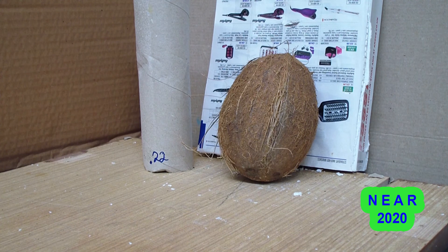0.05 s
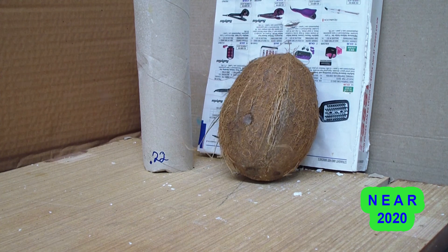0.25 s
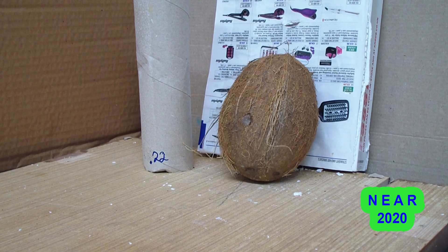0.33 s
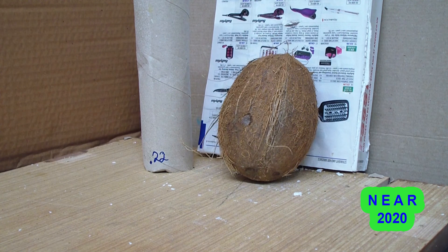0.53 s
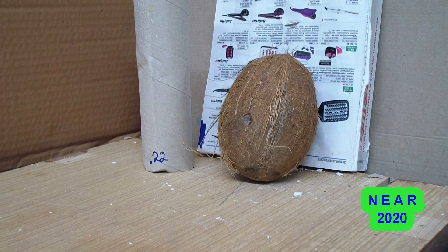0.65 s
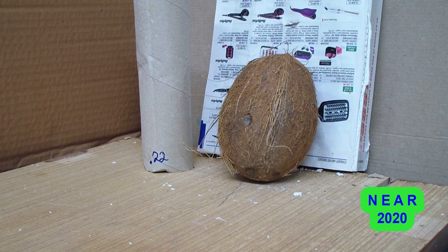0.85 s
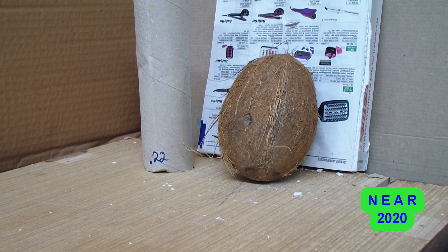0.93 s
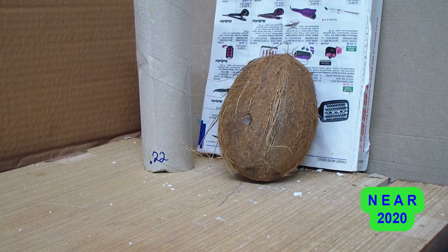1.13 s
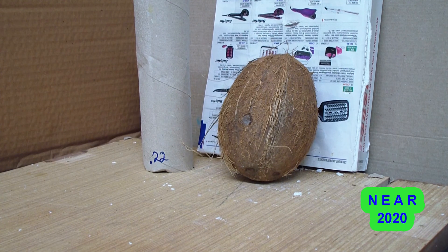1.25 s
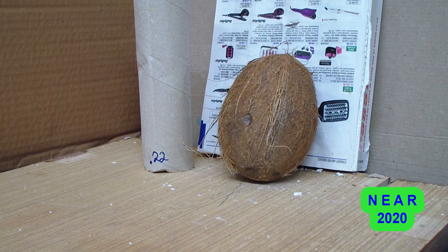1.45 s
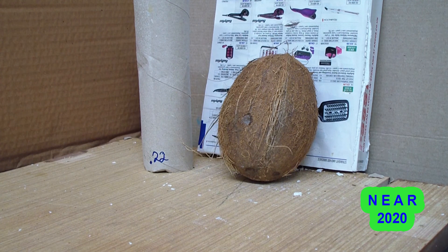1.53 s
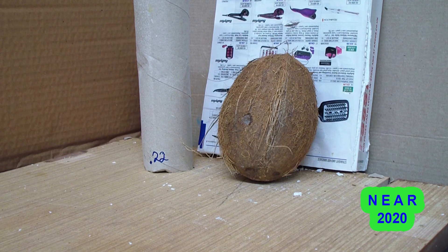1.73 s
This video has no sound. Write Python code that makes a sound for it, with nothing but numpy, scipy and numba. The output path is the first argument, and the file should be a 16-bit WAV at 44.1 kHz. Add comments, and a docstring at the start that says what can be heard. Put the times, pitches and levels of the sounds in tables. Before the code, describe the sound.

One loud air gun shot smacks a coconut close by, followed by quiet mechanical clicks and knocks

```python
"""Air rifle and coconut

A coconut stands close to the microphone among walls that echo briefly, and an air rifle fires at it.
The pellet's crack and shell ring come just before the report, a puff and rush of air with a boom.
Filtered noise bursts make small ticks, some of them chips, and the rifle's action clacking and knocking.
The recorder overloads and its gain ducks, then recovers while the echo dies; behind lie rustle and rumble.
"""
import sys
import numpy as np
from scipy import signal
from scipy.fft import rfft, irfft, next_fast_len
from scipy.io import wavfile
from numba import njit

SR = 44100
rng = np.random.default_rng(int(sys.argv[2]) if len(sys.argv) > 2 else 0)


def dump(signal):
    """Clip the signal to [-1, 1] and save it as 16-bit WAV at the path in sys.argv[1]."""
    limited = np.clip(np.atleast_2d(signal).T, -1, 1)
    pcm = np.round(limited * 32767).astype(np.int16)
    wavfile.write(sys.argv[1], SR, pcm)


N = 79380

# Spectrum levels are per Hz and relative: colour() evens out overall level, ambience() sets its own RMS.

# The coconut on its board, close by: one low bounce and the shell's ring: pitch_hz, level_db, t60_s
SHELL_MODES = [(117.5, -16, .04), (1390, -10, .005), (2013, -4.5, .008), (4480, -12, .01),
               (6800, -16, .012)]
# Spectrum of the crack: pitch_hz, level_db
CRACK_SPECTRUM = [(100, 7.5), (600, -4.5), (2000, -9), (5000, -7), (8000, -8), (16000, -30)]
STRIKE_S, STRIKE_DB, STRIKE_RISE_S = .2326, -38, .0016
# These three are relative to the strike, the echo to its crack
CRACK_DB, THUMP_DB, CRACK_ECHO_DB = -1, -12, -2


def pellet():
    """The pellet cracks the shell, rings it and shoves the nut against its backing."""
    onset = np.minimum(clock() / STRIKE_RISE_S, 1) ** 2
    shell = unit(ring(SHELL_MODES) * onset)
    thump = undb(THUMP_DB) * push(peak_s=0.00071)
    contact = hit(STRIKE_S + STRIKE_RISE_S, CRACK_DB, fall_s=.012, echo_db=CRACK_ECHO_DB)
    crack = colour(contact, CRACK_SPECTRUM)
    return undb(STRIKE_DB) * (at(shell + thump, STRIKE_S) + crack)


# Spectrum of the escaping air: pitch_hz, level_db
AIR_SPECTRUM = [(25, 7.5), (55, -9.5), (105, 2.5), (160, -12.5), (230, 1.5), (300, -9), (700, 3),
                (1100, -1), (1500, 2), (2800, 0), (5000, 1.5), (8000, -2), (12000, -7.5), (16000, -8)]
# Narrow resonances the shot wakes in the space and the things in it: pitch_hz, level_db, t60_s
ROOM_MODES = [(135.9, -8.5, 0.58), (184, -26, 0.91), (212, -26, 0.95), (232, -18.5, 0.49), (525, -22, 0.29),
              (727, -8, 0.14), (942, -20, 0.36), (1420, -11, 0.41), (1615, -14, 0.45), (1850, -12, 0.23)]
REPORT_S, REPORT_DB, BOOM_DB = .2408, -18.5, -4.5
AIR_RISE_S, AIR_FALL_S = 0.0087, 0.015
# Relative to the direct air
AIR_ECHO_DB, PUFF_DB = 9.5, -17


def report():
    """A puff and a rush of air from the muzzle; the space booms and the pressure swings slowly back."""
    t = clock()
    rise = np.minimum(t / AIR_RISE_S, 1)
    fall = np.exp(-np.maximum(t - AIR_RISE_S, 0) / AIR_FALL_S)
    rush = unit(rng.standard_normal(N) * rise * fall)
    echo = undb(AIR_ECHO_DB) * at(walls(), AIR_RISE_S / 2)
    air = colour(rush + echo, AIR_SPECTRUM)
    puff = undb(PUFF_DB) * push(peak_s=0.00035)
    blast = undb(REPORT_DB) * (air - puff)
    boom = undb(BOOM_DB) * ring(ROOM_MODES)
    swing = ring([(4.6, -5.5, 0.43)])  # pitch_hz, level_db, t60_s
    return at(blast + boom - swing, REPORT_S)


# Small ticks after the shot, chips landing and lastly a duller tick of the action:
# start_s, level_db (before filtering), low_edge_hz, high_edge_hz
TICKS = [(0.4716, -47.5, 900, 13000), (0.7703, -66.5, 4900, 19200), (1.0735, -60, 790, 3500)]
# Spectrum of a tick: pitch_hz, level_db
TICK_SPECTRUM = [(200, -41), (1000, 11.5), (2000, 1.5), (4000, 6.5), (6500, 9.5), (10000, -1), (16000, 4.5)]


def ticks():
    """Small ticks after the shot: chips landing, and lastly a duller tick of the action."""
    bursts = sum(band(hit(start, db, fall_s=0.0019, echo_db=-5), low_hz, high_hz)
                 for start, db, low_hz, high_hz in TICKS)
    return colour(bursts, TICK_SPECTRUM)


# Clacks and a faint scrape of the action: start_s, level_db, fall_s (to 1/e)
CLACKS_AND_SCRAPE = [(0.8091, -65, 0.0024), (.8147, -53.5, .0015), (.8211, -56.5, 0.0016),
                     (0.827, -56, 0.0021), (.934, -70.5, 0.0087), (1.588, -69.5, 0.027),
                     (1.657, -73.5, 0.018)]
# Spectrum of the clacks and scrape: pitch_hz, level_db
CLACK_SPECTRUM = [(100, -22.5), (450, -10.5), (610, 0), (850, -5.5), (1700, -5), (2400, 0), (3100, 0.5),
                  (4300, -2.5), (5800, -3.5), (8000, -11.5), (11000, -18), (16000, -24)]
# Ring of the cocking parts: pitch_hz, level_db, t60_s
LEVER_MODES = [(619, -3, 0.26), (2410, 4, 0.1), (3060, 5, 0.11)]
LEVER_DB = -11  # relative to the noise it goes with


def clacks_and_scrape():
    """Clacks and a faint scrape of the action: noise bursts, each with a ring of the cocking parts."""
    lever = undb(LEVER_DB) * unit(ring(LEVER_MODES))
    bursts = sum(hit(start, db, fall_s, echo_db=1.5) for start, db, fall_s in CLACKS_AND_SCRAPE)
    rings = sum(at(undb(db) * lever, start) for start, db, _ in CLACKS_AND_SCRAPE)
    return colour(bursts, CLACK_SPECTRUM) + rings


# Dull knocks as the action meets its stop:
# start_s, level_db (before filtering), low_edge_hz, high_edge_hz, echo_db (relative to the contact)
KNOCKS = [(.9645, -46, 230, 11990, -0.5), (1.5012, -60, 930, 4170, 5.5)]
# Spectrum of a knock: pitch_hz, level_db
KNOCK_SPECTRUM = [(100, -0.5), (250, 0.5), (400, 0.5), (560, 3.5), (720, -1.5), (1300, 0), (2200, -2.5),
                  (3200, -8.5), (5000, -12), (8000, -22), (16000, -28.5)]
# The stock's short woody ring under a knock: pitch_hz, level_db, t60_s
STOCK_MODES = [(467, 4, 0.043), (722, -21.5, 0.038), (1320, -19, 0.0073), (1700, -4, 0.014),
               (2140, -6.5, 0.012)]
STOCK_DB = -6  # relative to its knock


def knocks():
    """The action meets its stop: a very short contact over the stock's woody ring."""
    stock = undb(STOCK_DB) * unit(ring(STOCK_MODES))
    total = np.zeros(N)
    for start, db, low_hz, high_hz, echo_db in KNOCKS:
        contact = colour(hit(start, db, fall_s=0.0011, echo_db=echo_db), KNOCK_SPECTRUM)
        woody = at(undb(db) * stock, start)
        total += band(contact + woody, low_hz, high_hz)
    return total


# The catch snapping shut: start_s, level_db
SNAPS = [(1.7449, -53.5), (1.7485, -53)]
# Spectrum of the catch: pitch_hz, level_db
CATCH_SPECTRUM = [(150, -22.5), (750, -13), (1050, -18.5), (1350, -4), (2300, -2.5), (3000, -9.5),
                  (3600, 1.5), (4100, 0.5), (4900, -14), (7000, -14.5), (10000, -38), (16000, -29)]


def catch():
    """The catch snaps shut in short noisy contacts."""
    snaps = sum(hit(start, db, fall_s=0.0033, echo_db=0) for start, db in SNAPS)
    return colour(snaps, CATCH_SPECTRUM)


SLIDE_S, SLIDE_RISE_S, SLIDE_FALL_S = 1.665, .02, .25
SLIDE_DB, SLIDE_LOW_HZ = -53, 3500


def slide():
    """A faint slide of the action: treble noise that comes up quickly and dies away."""
    hiss = highpass(burst(SLIDE_FALL_S), SLIDE_LOW_HZ)
    rise = np.minimum(clock() / SLIDE_RISE_S, 1)
    return at(undb(SLIDE_DB) * hiss * rise, SLIDE_S)


RUSTLE_S, RUSTLE_RISE_S, RUSTLE_DB = 0.35, 0.27, -57


def rustle():
    """A faint hiss of movement once the shot is over: band-limited noise that fades in and stays."""
    swell = np.clip((clock() - RUSTLE_S) / RUSTLE_RISE_S, 0, 1)
    hiss = band(rng.standard_normal(N), low_hz=490, high_hz=8750)
    return undb(RUSTLE_DB) * swell * hiss


# Spectrum of the quiet place: pitch_hz, level_db
AMBIENCE_SPECTRUM = [(12, -4.5), (20, -2.5), (210, -17.5), (241, -13.5), (337, -19.5), (367, -21),
                     (802, -22.5), (1030, -25.5), (1530, -17.5), (1760, -26.5), (1960, -17), (3160, -27.5),
                     (4540, -28.5), (6910, -36), (16000, -38)]
AMBIENCE_DB = -53.5  # RMS


def ambience():
    """Faint steady rumble and hiss: noise shaped in frequency."""
    gain = undb(lookup(AMBIENCE_SPECTRUM, np.fft.rfftfreq(N, 1 / SR)))
    x = irfft(rfft(rng.standard_normal(N)) * gain, N)
    return undb(AMBIENCE_DB) * x / np.std(x)


# Echo of the walls: pitch_hz, t60_s (before the early emphasis)
WALL_T60 = [(60, 0.29), (220, 0.48), (500, 0.35), (1500, .38), (4000, 0.39), (8000, 0.34), (15000, 0.23)]
WALL_GAP_S, EARLY_S, EARLY_DB = .003, 0.06, -4


def walls():
    """Echo of the space: a stronger early part, then a tail in which each band dies at its own rate."""
    t = clock()
    log_hz = np.log(np.fft.rfftfreq(N, 1 / SR) + 1)
    noise = rfft(rng.standard_normal(N))
    centres = np.log([hz for hz, _ in WALL_T60])
    tail = np.zeros(N)
    for weight, (_, t60) in zip(np.eye(len(centres)), WALL_T60):
        one_band = irfft(noise * np.interp(log_hz, centres, weight), N)
        tail += one_band * decay(t, t60)
    early = 1 + undb(EARLY_DB) * np.exp(-t / EARLY_S)
    return at(unit(tail * early), WALL_GAP_S)


def hit(start, db, fall_s, echo_db):
    """One noise burst followed by its echo off the walls."""
    direct = unit(burst(fall_s))
    echo = undb(echo_db) * walls()
    return at(undb(db) * (direct + echo), start)


def burst(fall_s):
    """Noise that falls to 1/e in the given time."""
    return rng.standard_normal(N) * np.exp(-clock() / fall_s)


def push(peak_s):
    """One smooth pulse of pressure that peaks after the given time."""
    u = clock() / peak_s
    return unit(u ** 2 * np.exp(-2 * u))


def decay(t, t60):
    """Exponential fall of 60 dB in t60 seconds."""
    return np.exp(-np.log(1000) * t / t60)


def ring(modes):
    """Decaying sines of a struck body."""
    t = clock()
    return sum(undb(db) * np.sin(2 * np.pi * hz * t) * decay(t, t60) for hz, db, t60 in modes)


def colour(x, points):
    """Causal minimum-phase filter with the given spectrum; white noise keeps its power."""
    size = next_fast_len(N) * 2
    gain = undb(lookup(points, np.fft.rfftfreq(size, 1 / SR)))
    # Folding the cepstrum onto positive time makes the filter causal
    cepstrum = irfft(np.log(gain / np.sqrt(np.mean(gain ** 2))))
    cepstrum[1:size // 2] *= 2
    cepstrum[size // 2 + 1:] = 0
    return irfft(rfft(x, size) * np.exp(rfft(cepstrum)))[:N]


def highpass(x, hz):
    """Weaken what lies under hz."""
    return signal.sosfilt(signal.butter(3, hz, 'high', fs=SR, output='sos'), x)


def band(x, low_hz, high_hz):
    """Keep what lies between two edges."""
    lowpass = signal.butter(2, high_hz, fs=SR, output='sos')
    return signal.sosfilt(lowpass, highpass(x, low_hz))


def lookup(points, hz):
    """Read a table on a log-frequency axis."""
    f, v = np.array(points).T
    return np.interp(np.log(hz + 1e-9), np.log(f), v)


def undb(db):
    """Decibels to gain."""
    return 10 ** (np.asarray(db) / 20)


def unit(x):
    """Scale to the energy of one second at an RMS of 1."""
    return x / np.sqrt(np.sum(x ** 2) / SR + 1e-20)


def clock():
    """Time of every sample in seconds."""
    return np.arange(N) / SR


def at(x, start):
    """Delay a sound to its starting time."""
    return np.concatenate([np.zeros(int(start * SR)), x])[:N]


def scene():
    """Strike, report, ticks and handling over the quiet background."""
    shot = pellet() + report()
    action = clacks_and_scrape() + knocks() + catch() + slide()
    return (shot + ticks() + action + rustle() + ambience())[None]


@njit
def duck(over, attack, hold, recover):
    """Gain reduction in dB: grows quickly with overload, holds, then shrinks at a steady rate."""
    out, cut, wait = np.empty(len(over)), 0., 0.
    for i in range(len(over)):
        if over[i] > cut:
            cut += (over[i] - cut) * (1 - np.exp(-1 / (attack * SR)))
            wait = hold
        elif wait > 0:
            wait -= 1 / SR
        else:
            cut = max(cut - recover / SR, 0.)
        out[i] = cut
    return out


LIMIT_DB, ATTACK_S, HOLD_S, RECOVER_DB_PER_S = -8, 0.00044, 0.038, 130.5
CEILING, TOP_HZ = .53, 15800  # ceiling as a share of full scale


def record(dry):
    """The recorder ducks its gain under the shot, clips the peaks and cuts the top."""
    top = signal.ellip(10, .2, 80, TOP_HZ, fs=SR, output='sos')
    x = signal.sosfilt(top, dry[0])
    over_db = 20 * np.log10(np.abs(x) + 1e-9) - LIMIT_DB
    ducked = x * undb(-duck(over_db, ATTACK_S, HOLD_S, RECOVER_DB_PER_S))
    clipped = np.clip(ducked, -CEILING, CEILING)
    return signal.sosfiltfilt(top, clipped)[None]


dry = scene()
out = record(dry)
dump(out)
```